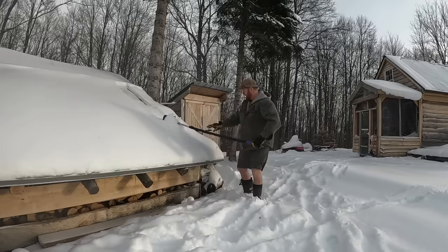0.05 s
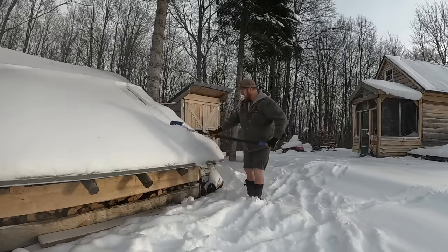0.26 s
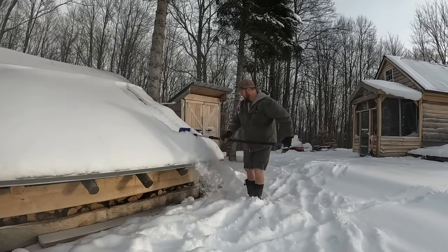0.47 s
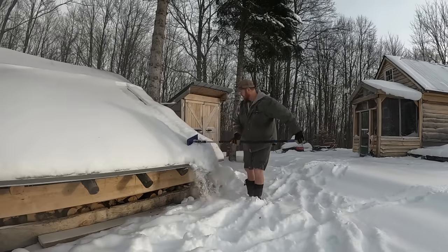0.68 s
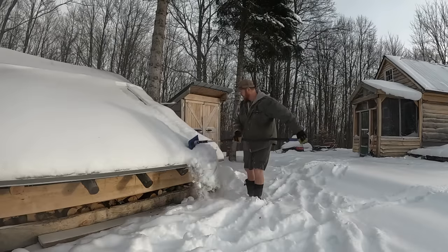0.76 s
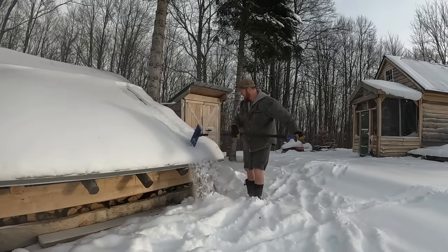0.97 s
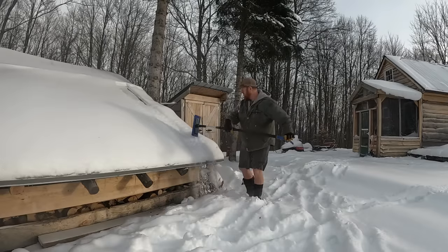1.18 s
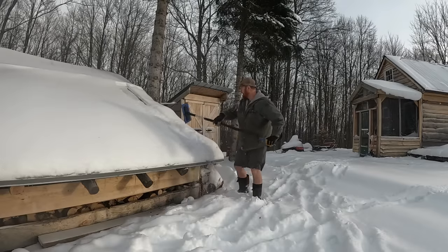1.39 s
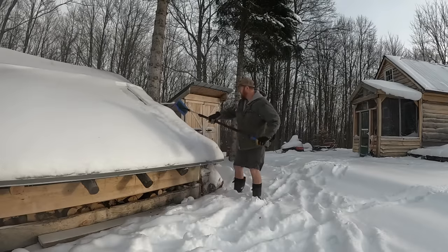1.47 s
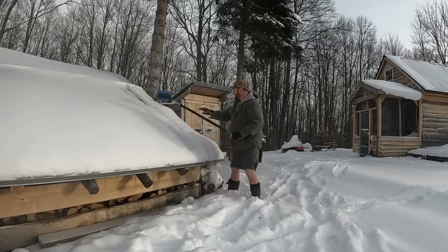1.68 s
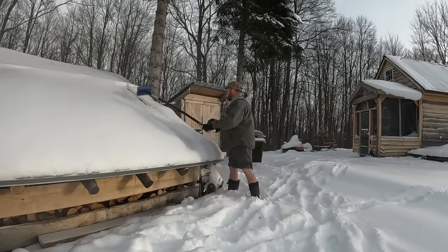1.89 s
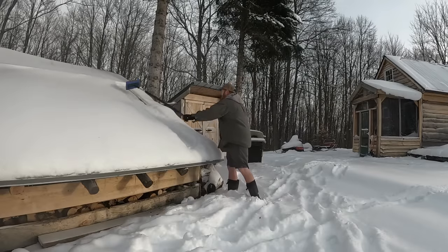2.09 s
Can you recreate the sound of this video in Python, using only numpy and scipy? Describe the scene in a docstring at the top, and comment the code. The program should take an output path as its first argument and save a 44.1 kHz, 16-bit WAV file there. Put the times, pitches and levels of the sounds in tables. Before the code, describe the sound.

A long-handled rake scrapes and knocks through crusty snow on a shed roof. Clumps drop to the ground with dull thuds and a soft rumble, then the rake crunches in again. Light outdoor wind buffets the microphone.

```python
"""A long-handled rake drags packed snow off a shed roof, outdoors in light wind.
Brittle fracture makes the crust crunch and snap, friction makes it squeak, and hard contacts of
the blade excite the modes of the hollow pole. Clumps land with damped low thuds, loose snow
rumbles and powder hisses after them. Then the rake bites into the snow again."""
import sys
import numpy as np
from scipy import signal
from scipy.fft import rfft, irfft, next_fast_len
from scipy.io import wavfile
from scipy.ndimage import map_coordinates

SR = 44100
rng = np.random.default_rng(int(sys.argv[2]) if len(sys.argv) > 2 else 0)


def dump_mix(stems):
    """Bounce the given channels to the path in sys.argv[1] as a 16-bit WAV at rate SR."""
    frames = np.atleast_2d(stems).T  # one column per channel
    limited = np.clip(frames, -1, 1)  # hard clip at full scale
    pcm = np.round(limited * 32767).astype(np.int16)
    wavfile.write(sys.argv[1], SR, pcm)


N = 93712
T = np.arange(N) / SR

# Blade pushing through crust: t/s, length/s, level/dB, tilt/(dB per octave)
BLADE_PUSHES = [(0.296, 0.037, -61, -0.5), (0.61, 0.133, -68.5, -11), (.847, 0.044, -49, -2),
                (1.401, 0.048, -58.5, 2), (1.513, 0.062, -54.5, -2.5), (1.66, 0.037, -54, -1.5),
                (1.797, 0.0072, -50.5, -3), (1.812, 0.027, -47, -2.5), (1.865, 0.046, -59.5, -1),
                (2.033, 0.027, -60.5, -15.5)]
# Icy crust cracking: t/s, level/dB, t60/s, tilt/(dB per octave)
ICE_CRACKS = [(0.7926, -42, 0.031, -0.5), (1.3596, -49, 0.0073, 2.5), (1.393, -55.5, 0.014, 4),
              (1.4016, -49, 0.011, 3), (1.407, -45.5, 0.0076, 5), (1.414, -50, 0.016, 7.5),
              (1.4245, -44, 0.012, 4), (1.4355, -41, 0.0082, -5), (1.4383, -31.5, 0.0079, -1),
              (1.4433, -42, .006, 6), (1.8158, -29.5, 0.0043, 6.5)]
# Hard contacts of the blade: t/s, level/dB, t60/s, upper edge/Hz, relative pole ring/dB
BLADE_CONTACTS = [(0.1656, -42, 0.013, 7850, -11), (0.402, -42.5, 0.012, 7340, -28),
                  (0.4341, -46, 0.017, 6700, -15), (0.7543, -37, 0.015, 9700, -12.5),
                  (0.7902, -40, 0.028, 4300, 3.5), (0.8313, -49.5, 0.032, 9300, -13),
                  (0.8467, -49, .025, 8200, -14), (0.8654, -45.5, 0.022, 5800, -25),
                  (.8815, -41, 0.011, 6900, -2), (0.9, -47, 0.015, 9000, -28),
                  (1.061, -52, 0.02, 7200, -12), (1.262, -50, 0.021, 9200, -39),
                  (1.515, -49, 0.022, 6100, -16), (1.5943, -43.5, 0.028, 3800, -11),
                  (1.652, -38.5, 0.014, 3070, -33), (1.6647, -39, 0.017, 6500, -10.5),
                  (1.814, -41.5, 0.022, 7860, -12), (1.823, -40.5, 0.022, 4000, -13),
                  (1.8811, -47.5, 0.036, 2370, -13.5), (1.9571, -41, 0.014, 2670, -14)]
# Modes of the pole: f/Hz, level/dB, free t60/s
POLE_MODES = [(1007, 1.5, 0.12), (1710, 4, 0.054), (2586, 0, 0.053), (3310, -3, 0.029), (3440, -13, 0.17),
              (4091, -8, 0.056), (5560, -69, 0.029), (5600, -21, 0.027)]
# Snow rubbing under the blade: t/s, length/s, level/dB, f/Hz
SNOW_RUBS = [(1.542, 0.017, -57.5, 7370), (1.677, .02, -58, 1305), (1.824, 0.0059, -41.5, 2490),
             (1.844, 0.019, -58.5, 7060), (1.882, 0.0069, -48, 1660), (2.059, 0.021, -61.5, 1393)]
# Clumps landing: t/s, level/dB, f/Hz, upper edge/Hz, left minus right/dB
LANDINGS = [(.128, -35, 120, 252, 3), (.1335, -39, 450, 868, 1.5), (.216, -33.5, 93, 258, -9),
            (0.382, -22, 46.6, 154, -2.5), (.4525, -25.5, 283, 390, -12), (0.4594, -17.5, 120, 280, 5),
            (0.48, -16.5, 48.5, 264, -1.5), (0.5755, -21, 112, 245, -5), (.5775, -28, 293, 450, -16),
            (0.651, -18, 84, 200, 1), (0.663, -16, 139, 302, -8.5), (0.718, -18, 41.7, 150, -6.5),
            (0.745, -23.5, 71, 180, -2), (0.7706, -14, 104, 212, -6), (0.791, -18, 76.6, 200, -1),
            (0.9429, -14.5, 160, 272, -6), (1.331, -24, 115, 201, -3), (1.36, -15, 93, 313, 1.5),
            (1.3603, -34, 670, 890, -15), (1.3633, -10.5, 260, 443, -11.5), (1.407, -21.5, 370, 590, -12.5),
            (1.415, -18.5, 118, 223, -5), (1.4464, -15.5, 162, 410, -9), (1.515, -21, 75.5, 171, -4.5),
            (1.638, -30.5, 97, 202, 16), (1.654, -23.5, 108, 260, -5), (1.990, -43, 410, 584, 2)]

# Spectral envelopes: f/Hz, relative level/dB
CRUST_SPECTRUM = [(300, -48), (650, -10.5), (800, -13), (980, -4), (1350, -0.5), (2000, -6), (2550, -3.5),
                  (4500, -9), (7300, -10.5), (8400, -19.5), (12500, -17.5), (15500, -29)]
ICE_SPECTRUM = [(600, -16), (1400, -12), (2200, 2.5), (3800, -1), (5000, -4), (7000, -4), (8800, -20),
                (12500, -17.5), (15500, -46)]
LOOSE_SNOW_SPECTRUM = [(25, -5.5), (60, -0.5), (110, 2), (200, -5.5), (290, -18.5), (400, -29.5),
                       (650, -53), (1400, -76.5), (3000, -120)]
POWDER_SPECTRUM = [(500, -21), (1300, 11.5), (3000, 6), (7000, 0.5), (8600, -5), (12500, -10), (15500, -66)]
SPRAY_SPECTRUM = [(2000, -45), (4500, -9.5), (7000, -2), (8600, -6.5), (12500, -4), (14000, -15.5),
                  (15500, -8)]
WIND_SPECTRUM = [(12, -3), (25, 1), (42, 7), (70, -11.5), (110, -12.5), (180, -28), (300, -51.5),
                 (600, -104.5)]
AIR_SPECTRUM = [(100, 11.5), (200, 11), (300, -1), (450, -4), (750, -12), (1300, -12), (3000, -18.5),
                (7000, -18), (8600, -32.5), (12500, -25), (15500, -33)]

# Time envelopes: t/s, level/dB
LOOSE_SNOW_LEVEL = [(0, -55.5), (.3, -55.5), (.42, -54.5), (.47, -35), (.55, -35), (.78, -34), (.88, -40.5),
                    (1.0, -61), (1.18, -53.5), (1.3, -70), (1.38, -25.5), (1.48, -33), (1.55, -48),
                    (1.65, -43), (1.72, -60.5), (2.12, -59.5)]
POWDER_LEVEL = [(0, -73.5), (.27, -72.5), (.36, -66.5), (.6, -70), (.75, -62), (.97, -68), (1.16, -74),
                (1.22, -112), (1.32, -72), (1.5, -63), (1.75, -70), (1.9, -67.5), (2.12, -73.5)]
SPRAY_LEVEL = [(0, -77), (.6, -75), (.95, -70.5), (1.17, -65), (1.23, -72), (1.5, -82), (2.12, -83)]
WIND_LEVEL = [(0, -32), (.12, -35), (.26, -41.5), (.32, -33), (.5, -28), (.8, -29.5), (1.0, -36.5),
              (1.1, -35.5), (1.28, -37.5), (1.45, -37), (1.6, -30.5), (1.76, -49.5), (1.88, -36),
              (1.98, -49), (2.12, -31)]

# Microphone balance: f/Hz, left minus right/dB
BALANCE = [(500, -0.5), (1000, 0), (2000, -0.4), (4500, 0.5), (8000, 1), (12500, 5.5)]


def crunches(attack_s=0.0039, release_s=0.009, sag_db=2.5, clusters_per_s=340, cluster_db=4):
    """Granular fracture: snow grains break in clusters of impulses while the blade pushes."""
    out = np.zeros(N)
    for s, length, db, tilt_db in BLADE_PUSHES:
        t = np.maximum(T - s, 0)
        push = (1 - np.exp(-t / attack_s)) * np.exp(-np.maximum(t - length, 0) / release_s)
        clusters = map_coordinates(rng.standard_normal(2000), [T * clusters_per_s], order=1, mode="wrap")
        grains = crackle(per_s=4500, spread_db=4) * amp(cluster_db * clusters)
        grains = unit(coloured(grains, tilted(CRUST_SPECTRUM, tilt_db)))
        out += amp(db - sag_db * np.minimum(t / length, 1)) * push * grains
    return out


def snaps():
    """Brittle fracture: icy crust gives way abruptly, and so short a pulse has a broad spectrum."""
    out = np.zeros(N)
    for s, db, t60, tilt_db in ICE_CRACKS:
        tick = rng.standard_normal(N) * decay(s, t60, attack_s=0.00031)
        out += amp(db + 3) * coloured(tick, tilted(ICE_SPECTRUM, tilt_db))
    return out


def knocks(ring_time_share=0.38, detune=0.006):
    """Impact excitation: each gritty blow sets the damped modes of the hollow pole ringing."""
    cracks, ring = np.zeros(N), np.zeros(N)
    for s, db, t60, edge_hz, ring_db in BLADE_CONTACTS:
        burst = rng.standard_normal(N) * decay(s, t60, attack_s=0.0011)
        lowpass = signal.butter(6, edge_hz, fs=SR, output="sos")
        cracks += amp(db + 3) * signal.sosfilt(lowpass, burst)
        for hz, mode_db, free_t60 in POLE_MODES:
            struck_hz = hz * (1 + detune * rng.normal())
            tone = np.sin(2 * np.pi * (struck_hz * T + rng.random()))
            gain = amp(db + ring_db + mode_db + rng.normal(0, 0.67))
            ring += gain * decay(s, ring_time_share * free_t60, attack_s=0.0016) * tone
    return coloured(cracks, CRUST_SPECTRUM) + ring


def squeaks(relative_half_width=0.048):
    """Friction: grains rubbing together give a brief, narrow band of noise."""
    out = np.zeros(N)
    for s, length, db, hz in SNOW_RUBS:
        noise = rng.standard_normal(N)
        rub = filtered(noise, lambda f: 1 / (1 + ((f / hz - 1) / relative_half_width) ** 4))
        out += amp(db) * gaussian(s, length / 2) * unit(rub)
    return out


def thuds(decay_cycles=0.9, suction_share=0.86, suction_s=0.0036):
    """Inelastic impact: a clump draws air after it, then lands with one heavily damped low push."""
    out = np.zeros((2, N))
    for s, db, hz, edge_hz, side_db in LANDINGS:
        cycles = np.maximum(T - s, 0) * hz
        push = np.sin(2 * np.pi * cycles) * np.exp(-np.minimum(cycles / decay_cycles, 20))
        suction = suction_share * gaussian(s - suction_s, suction_s)
        thud = filtered(push - suction, lambda f: 1 / (1 + (f / edge_hz) ** 5))
        out += amp(db) * pan(side_db) * thud
    return out


def tumbling():
    """Shot noise: the random impacts of many small, soft lumps merge into a rumble."""
    lumps = unit(coloured(crackle(per_s=500, spread_db=3.5), LOOSE_SNOW_SPECTRUM))
    rumble = rush(LOOSE_SNOW_SPECTRUM, side_db=-2)
    return level(LOOSE_SNOW_LEVEL) * (lumps * pan(db=-6.5) + amp(-9) * rumble)


def powder():
    """Incoherent addition: falling grains sum to a hiss, with a few crumbs and a lingering fine spray."""
    hiss = rush(POWDER_SPECTRUM, side_db=-7.5)
    crumbs = amp(-10.5) * coloured(crackle(per_s=400, spread_db=6), POWDER_SPECTRUM)
    spray = rush(SPRAY_SPECTRUM, side_db=-3.5) * pan(db=1.5)
    return level(POWDER_LEVEL) * (hiss + crumbs) + level(SPRAY_LEVEL) * spray


def yard(x):
    """Diffuse reflection: the shed and the trees return a short reverberant tail."""
    tail = rng.standard_normal((2, N)) * decay(0, t60=0.086, attack_s=0.00083)
    return signal.fftconvolve(x[None], tail / np.linalg.norm(tail[0]), axes=1)[:, :N]


def wind():
    """Turbulence: gusts buffet at low frequencies over the steady noise of the open air."""
    gusts = level(WIND_LEVEL) * rush(WIND_SPECTRUM, side_db=-9)
    return gusts + amp(-58) * rush(AIR_SPECTRUM, side_db=-11.5)


def amp(db):
    return 10 ** (np.asarray(db) / 20)


def unit(x):
    return x / np.sqrt(np.mean(x ** 2) + 1e-20)


def along(points, hz):
    """Interpolation on a logarithmic frequency axis."""
    f, v = np.transpose(points)
    return np.interp(np.log(hz + 1), np.log(f), v)


def level(points):
    """Gain per sample, by interpolation in decibels."""
    return amp(np.interp(T, *np.transpose(points)))


def decay(s, t60, attack_s):
    """Exponential damping after a quick rise at time s."""
    t = np.maximum(T - s, 0)
    return (1 - np.exp(-t / attack_s)) * amp(-np.minimum(60 * t / t60, 200))


def gaussian(s, half_width_s):
    """Gaussian pulse centred on time s."""
    return np.exp(-np.minimum(((T - s) / half_width_s) ** 2, 20))


def filtered(x, response):
    """Linear filtering: the spectrum is multiplied by a frequency response."""
    size = next_fast_len(N + 8192)
    return irfft(rfft(x, size) * response(np.fft.rfftfreq(size, 1 / SR)), size)[..., :N]


def coloured(x, spectrum, size=2048):
    """Minimum-phase filtering at unit energy: folding the cepstrum makes the response causal."""
    cepstrum = irfft(np.log(amp(along(spectrum, np.fft.rfftfreq(size, 1 / SR)))))
    cepstrum[1:size // 2] *= 2
    cepstrum[size // 2 + 1:] = 0
    response = irfft(np.exp(rfft(cepstrum)))
    return signal.fftconvolve(x, response / np.linalg.norm(response))[:N]


def tilted(spectrum, tilt_db):
    """Spectral tilt of tilt_db per octave."""
    return [(hz, db + tilt_db * np.log2(hz / spectrum[0][0])) for hz, db in spectrum]


def pan(db):
    """Left and right gains for an interaural level difference."""
    gains = amp(np.array([db / 2, -db / 2])).reshape(2, -1)
    return gains / gains.mean(axis=0)


def rush(spectrum, side_db):
    """Partly coherent stereo noise of rms 1; side_db sets the part in antiphase."""
    mid, side = filtered(rng.standard_normal((2, N)), lambda hz: amp(along(spectrum, hz)))
    return unit(np.array([mid + amp(side_db) * side, mid - amp(side_db) * side]))


def crackle(per_s, spread_db):
    """Poisson impulses of uneven size, rms 1."""
    sizes = amp(spread_db * np.clip(rng.standard_normal(N), -2, 2))
    signs = np.sign(rng.standard_normal(N))
    return unit(sizes * signs * (rng.random(N) < per_s / SR))


def scene():
    """Superposition: the rake, its reflections, the falling snow and the wind add linearly."""
    rake = knocks() + crunches() + snaps() + squeaks()
    # a part in quadrature gives the two ears a phase difference
    side = amp(-14) * filtered(rake, lambda hz: 1j * np.minimum(hz / 3000, 1.5))
    direct = rake * pan(db=-0.5) + np.array([-side, side])
    background = wind()
    return direct + amp(-10) * yard(rake) + thuds() + tumbling() + powder() + background


def record(dry, low_hz=8, top_hz=15700):
    """Band limiting: the microphones drop the deepest rumble and top treble; the left is brighter."""
    def response(hz):
        highpass = 1j * hz / (1j * hz + low_hz)
        return pan(along(BALANCE, hz)) * highpass * (hz < top_hz)
    return filtered(dry, response)


dry = scene()
out = record(dry)
dump_mix(out)
```